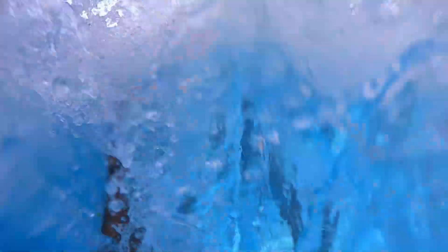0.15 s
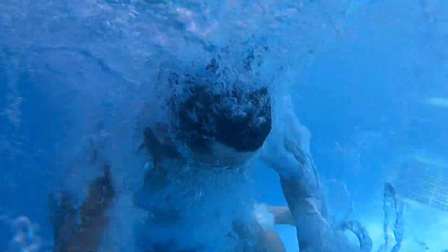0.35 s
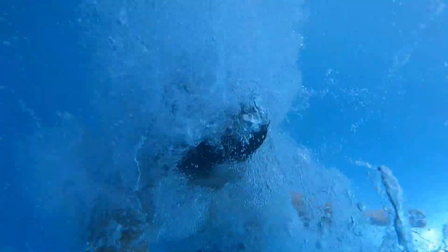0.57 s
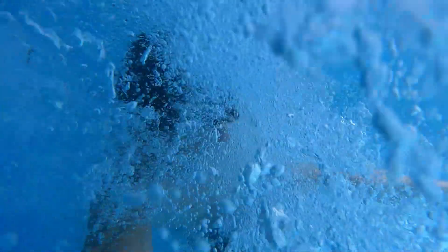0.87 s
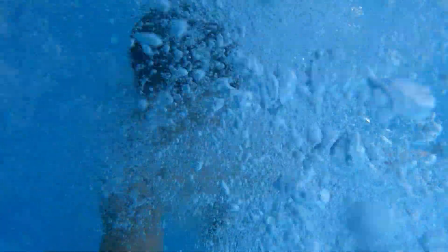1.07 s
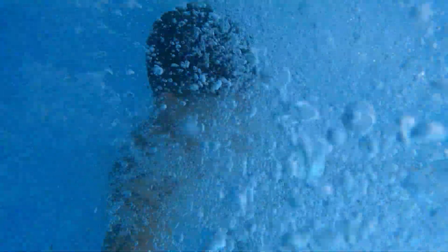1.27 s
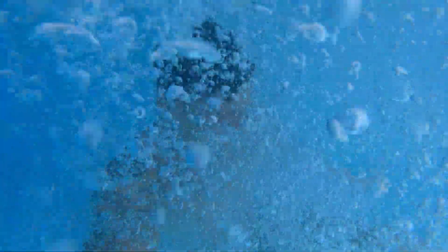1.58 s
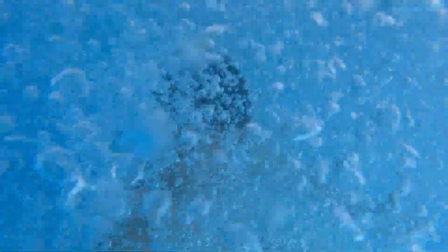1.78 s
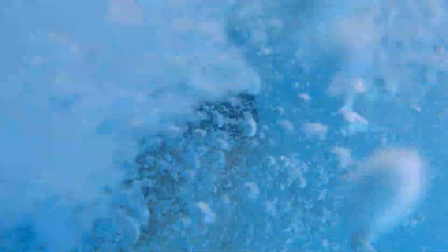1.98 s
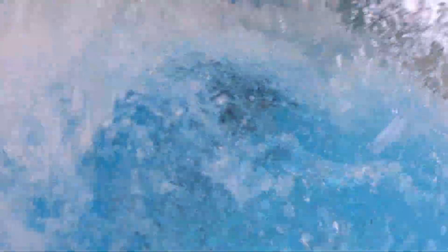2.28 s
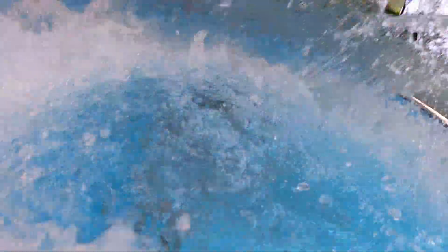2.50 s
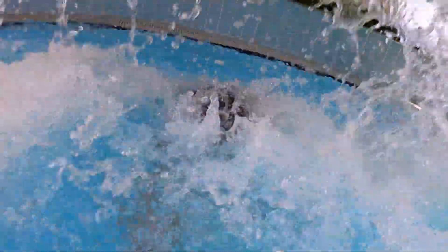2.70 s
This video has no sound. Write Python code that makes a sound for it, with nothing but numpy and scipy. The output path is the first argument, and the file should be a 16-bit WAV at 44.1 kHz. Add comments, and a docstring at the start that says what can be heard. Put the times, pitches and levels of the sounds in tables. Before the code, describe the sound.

Water splash and rushing spray cut to deep underwater gurgles, ending with a rumbling, splashy resurfacing

```python
"""Plunge from a water slide

A rider shoots off a water slide into the pool, holding a waterproof camera. Spray (shaped noise) and slaps
of water (noise bursts over dull thumps) give way to the plunge: big air pockets glug and a cloud of bubbles
gurgles and ticks (decaying sines), muffled by the housing, while buffeting rumbles. The camera rises through
froth and surfaces; drops smack it and the slide rushes on, ringing in the water film on the microphone."""
import sys
import numpy as np
from scipy import signal
from scipy.fft import rfft, irfft
from scipy.io import wavfile
from scipy.ndimage import uniform_filter1d

SR = 44100
rng = np.random.default_rng(int(sys.argv[2]) if len(sys.argv) > 2 else 0)


def waveform_to_disk(signal):
    """Save audio, clipped to [-1, 1], as 16-bit WAV at the path in sys.argv[1]."""
    frames = np.transpose(np.atleast_2d(signal))
    scaled = np.clip(frames, -1, 1) * 32767
    samples = np.round(scaled).astype(np.int16)
    wavfile.write(sys.argv[1], SR, samples)


N = 125685  # length in samples

# Spray in the open air: level [t/s, level/dB] and spectrum [f/Hz, level/dB]
SPRAY_LEVEL = [(0, -34.5), (.22, -28), (.3, -31), (.38, -32), (.455, -28.5), (.485, -59)]
SPRAY_SPECTRUM = [(40, -15), (150, -6), (500, -2), (1000, -7), (3300, -11.5), (5400, -21.5), (6600, -34),
                  (9000, -41.5), (15000, -59)]
# Rush of the slide through the wet microphone: level [t/s, level/dB] and spectrum [f/Hz, level/dB]
RUSH_LEVEL = [(2.24, -61), (2.29, -30), (2.45, -31.5), (2.68, -37), (2.85, -37.5)]
RUSH_SPECTRUM = [(35, 15.5), (130, -5.5), (650, -3), (1400, -6.5), (1900, -3), (2900, -25), (5000, -31.5),
                 (7500, -57)]
# Two resonances of the draining water film, before flutter [t/s, upper f/Hz, lower level/dB, upper level/dB]
FILM_RESONANCES = [(2.27, 2767, -48.5, -60), (2.338, 3400, -35.5, -49.5), (2.421, 3780, -41, -55.5),
                   (2.508, 3520, -36, -47), (2.601, 3660, -44.5, -60), (2.739, 3800, -55, -75)]
# Water pushing on the housing: level [t/s, level/dB] and spectrum [f/Hz, level/dB]
BUFFET_LEVEL = [(0, -36), (.2, -24), (.31, -26), (.48, -38), (.85, -25.5), (1.12, -25), (1.24, -31),
                (1.65, -32), (1.8, -20.5), (2.18, -22), (2.28, -27), (2.34, -19), (2.41, -26), (2.55, -19),
                (2.62, -35.5), (2.85, -51)]
BUFFET_SPECTRUM = [(15, 4.5), (35, 4), (60, 8), (100, -8.5), (170, -8), (300, -17), (800, -72.5)]
# Surges that shove the housing [t/s, onset f/Hz, level before swell and decay/dB]
SURGES = [(0.244, 73, -2.5), (0.473, 61.7, -7), (2.15, 52.6, -6), (2.322, 47.5, -10), (2.5, 64.3, -8)]
# Slaps of water on the housing [t/s, level before swell and decay/dB, burst decay time constant/s, cut-off f/Hz]
SLAPS = [(0.229, -20, 0.023, 8300), (0.432, -17, 0.019, 4000), (0.456, -15, 0.0065, 3700),
         (0.469, -7, 0.004, 2000), (0.508, -13, 0.012, 2950), (.575, -22.5, 0.0065, 3000),
         (0.714, -25.5, 0.041, 3500), (.806, -16.5, 0.0024, 3630), (1.712, -25, 0.0017, 5200),
         (1.75, -35, 0.0046, 4740), (1.773, -18, 0.003, 3770), (1.783, -23, 0.0034, 4000),
         (1.877, -36, 0.005, 4200), (2.084, -30, 0.01, 3800), (2.13, -24, 0.0084, 3000),
         (2.174, -26, 0.013, 2650), (2.24, -25, 0.011, 2760), (2.341, -21.5, 0.005, 4000),
         (2.453, -14.5, 0.005, 3300), (2.486, -28, 0.007, 4800), (2.511, -22.5, 0.0042, 4400),
         (2.582, -35, 0.016, 3000)]
# Large, middling and small bubbles of the cloud: levels [t/s, level/dB]
LARGE_LEVEL = [(.33, -26.5), (.44, -19), (.56, -22), (.68, -26.5), (.87, -22.5), (1.181, -17.5),
               (1.225, -27), (1.291, -19), (1.66, -18), (1.742, -19.5), (1.921, -16), (2.18, -21),
               (2.25, -25)]
MIDDLE_LEVEL = [(.28, -31.5), (.35, -31.5), (.43, -34), (.49, -20.5), (.55, -24.5), (.68, -27), (.745, -21),
                (.84, -39.5), (.91, -27), (1.07, -36), (1.16, -31), (1.22, -40), (1.66, -42.5), (1.79, -34),
                (1.98, -22), (2.19, -30), (2.29, -38)]
SMALL_LEVEL = [(0.459, -30.5), (.56, -41), (0.659, -36.5), (.69, -48.5), (.84, -33), (.91, -26), (.98, -39),
               (1.13, -44), (1.208, -57), (1.429, -61), (1.68, -53.5), (1.77, -34), (1.83, -40),
               (1.94, -42), (2.02, -44.5), (2.289, -47)]
# The same three sizes heard through the housing: spectra [f/Hz, level/dB]
LARGE_SPECTRUM = [(40, -22.5), (90, -3), (145, -3.5), (220, -0.5), (380, 2), (580, -4), (900, -15),
                  (1400, -33.5)]
MIDDLE_SPECTRUM = [(300, -9), (600, -4), (1120, 3.5), (1350, -1.5), (1800, -7.5), (2100, -10.5),
                   (2400, -31)]
SMALL_SPECTRUM = [(900, 0.5), (1750, 9), (2250, -6.5), (2800, 0), (3500, -8.5), (4600, -24.5), (7000, -41)]
# Froth boiling just under the surface: level [t/s, level/dB] and spectrum [f/Hz, level/dB]
FROTH_LEVEL = [(1.86, -56), (1.951, -39), (2.04, -23), (2.139, -19), (2.201, -29), (2.23, -47)]
FROTH_SPECTRUM = [(400, -0.5), (1200, -2), (1550, 8), (1800, -22.5), (2100, -22)]
# Fine foam crackling on the housing: level [t/s, level/dB] and spectrum [f/Hz, level/dB]
FOAM_LEVEL = [(.6, -58), (.92, -58), (1.1, -75.5), (1.68, -89), (1.72, -55.5), (1.79, -61.5), (1.97, -72.5),
              (2.28, -72), (2.35, -57), (2.52, -52.5), (2.66, -76)]
FOAM_SPECTRUM = [(1500, 1.5), (5500, -5.5), (7200, -19)]
# Single big air pockets [t/s, onset f/Hz, level before swell, decay, flutter and low-pass/dB,
# cycles of the onset pitch until 60 dB down]
GLUGS = [(.483, 970, -6.5, 39.5), (0.510, 213.4, 8.5, 11.5), (0.509, 1143, -5.5, 57), (0.546, 976, -9, 35),
         (.574, 688, -7.5, 63), (0.697, 505, -10.5, 39.5), (0.714, 268, 4.5, 10.5), (0.723, 1013, -12, 93),
         (.73, 870, -7.5, 90), (0.74, 227, 3.5, 11), (0.848, 186, -5, 18), (0.848, 491, -14, 44),
         (1.274, 338.8, -13, 61.5), (1.413, 443.4, -13.5, 66), (1.594, 306.4, -11.5, 42),
         (1.62, 349.7, -10, 85.5), (2.189, 547, 2.5, 18.5), (2.257, 775, -4, 17)]
# Small bubbles that burst against the housing [t/s, f/Hz, level before swell, decay and low-pass/dB]
PINGS = [(0.877, 2780, -14), (0.898, 2860, -14.5), (0.897, 3490, -18.5), (1.122, 2630, -24.5),
         (1.228, 4030, -30.5), (1.286, 1946, -20.5), (1.472, 2970, -36.5), (1.532, 3130, -40),
         (1.661, 3060, -34), (1.711, 1380, -11.5), (1.874, 1990, -13.5), (1.885, 3270, -29),
         (2.245, 2700, -22.5), (2.342, 3400, -18.5)]

FILM_LOWER_HZ, FILM_WIDTH_HZ = 1874, 280
SURGE_CYCLES = 6.8  # until 60 dB down
SLAP_ATTACK_SHARE = 0.18  # attack time constant as a share of the decay's
THUMP_HZ, THUMP_DB = 164, 3  # cut-off; level relative to the burst
STEADY_S = 0.056  # the bubble textures are evened over one or two of these
GLUG_RISE, GLUG_ATTACK_CYCLES = 0.1, 1.4  # fractional climb in pitch by 60 dB down; swell
PING_CYCLES, PING_ATTACK_CYCLES = 55, 4
HOUSING_HZ, HOUSING_CYCLES, HOUSING_DB = 1707, 34, -2.5  # the housing's own ring, level relative to the ping
OVERLOAD = 0.98  # amplitude that rounded peaks approach
TOP_HZ = 15600


def undb(db):
    """Decibels are twenty times the decimal logarithm of the amplitude ratio; return that ratio."""
    return 10 ** (np.asarray(db) / 20)


def unit(x):
    """Normalisation: divide by the root mean square so that it becomes 1."""
    return x / np.sqrt(np.mean(x ** 2) + 1e-18)


def fader(rows, fade_db_per_s=900):
    """Envelope: gain linear in decibels between (t/s, level/dB) points, dying away beyond the ends."""
    t = np.arange(N) / SR
    s, db = np.array(rows).T
    outside_s = np.abs(t - np.clip(t, s[0], s[-1]))
    return undb(np.interp(t, s, db) - fade_db_per_s * outside_s)


def colour(x, points):
    """Minimum-phase filtering through (f/Hz, level/dB) points, falling steeply above the last; rms 1."""
    hz, db = np.array(points).T
    size = 8192
    f = np.maximum(np.fft.rfftfreq(size, 1 / SR), 1)
    octaves_above = np.log2(np.maximum(f / hz[-1], 1))
    shape_db = np.interp(np.log(f), np.log(hz), db) - 24 * octaves_above
    # folding the cepstrum onto positive time makes the response causal
    cepstrum = irfft(np.log(undb(shape_db)))
    cepstrum[1:size // 2] *= 2
    cepstrum[size // 2 + 1:] = 0
    impulse_response = irfft(np.exp(rfft(cepstrum)))
    return unit(signal.fftconvolve(x, impulse_response)[:N])


def lowpass(x, hz, order=2):
    """Butterworth low-pass: a maximally flat passband below the cut-off."""
    sections = signal.butter(order, min(hz, SR / 2 - 1000), fs=SR, output="sos")
    return signal.sosfilt(sections, x)


def even(x, span_s):
    """Level equalisation: divide a random texture by its running rms over about the given span."""
    size = max(int(span_s * SR), 2)
    power = uniform_filter1d(uniform_filter1d(x ** 2, size), size)
    return x / np.sqrt(np.abs(power) + 1e-9)


def add(out, s, sound):
    """Superposition: sum a sound into the mix from time s."""
    i = int(np.clip(s * SR, 0, N - 1))
    out[i:i + len(sound)] += sound[:N - i]


def flutter(depth_db, rate_hz):
    """Random amplitude modulation: low-passed noise makes the gain tremble in decibels."""
    return undb(depth_db * unit(lowpass(rng.standard_normal(N), rate_hz)))


def patter(spread_db):
    """Shot noise: countless droplets merge into a hiss; a wider spread of strengths makes it crackle."""
    strength = np.minimum(rng.exponential(size=N), 7)
    return rng.standard_normal(N) * undb(spread_db * strength)


def bubble(hz, cycles, rise, attack_cycles):
    """Volume pulsation of an air pocket: a damped sine that swells, fades and may climb in pitch."""
    c = np.arange(int(cycles * SR / hz) + 2) * hz / SR  # time in cycles of the onset pitch
    age = c / cycles  # 1 at 60 dB down
    tone = np.sin(2 * np.pi * c * (1 + rise * age / 2))
    decay = np.exp(-np.log(1000) * age)
    swell = 1 - np.exp(-(c / attack_cycles) ** 2)
    return tone * decay * swell


def cloud(low_hz, high_hz, per_s, cycles, rise, spread_db, attack_cycles):
    """Incoherent sum of bubbles of random time, pitch, strength and ring time."""
    out = np.zeros(N)
    count = int(per_s * N / SR)
    for when, pitch, strength, ring in rng.random((count, 4)):
        hz = low_hz * (high_hz / low_hz) ** pitch
        gain = undb(-spread_db * np.log(1 - strength * .99))
        sound = bubble(hz, cycles * 2 ** (ring - .5), rise, attack_cycles)
        add(out, when * N / SR, gain * sound)
    return out


def water_film():
    """Resonance of a draining film: two narrow bands of noise, the upper gliding, ring fitfully."""
    t = np.arange(N) / SR
    s, upper_hz, lower_db, upper_db = np.array(FILM_RESONANCES).T
    lower = (np.full(N, FILM_LOWER_HZ), lower_db)
    upper = (np.interp(t, s, upper_hz), upper_db)
    film = 0
    for hz, db in (lower, upper):
        phase = 2 * np.pi * np.cumsum(hz) / SR
        # two slow noises in quadrature form a band around the resonance
        a, b = lowpass(rng.standard_normal((2, N)), FILM_WIDTH_HZ / 2)
        band = unit(a * np.cos(phase) + b * np.sin(phase))
        film = film + band * fader(np.column_stack([s, db]))
    return film * flutter(depth_db=4.5, rate_hz=50)


def open_air():
    """Broadband droplet noise: spray before the dive, then the slide's rush with the ringing film."""
    drops = patter(spread_db=3)
    spray = colour(drops, SPRAY_SPECTRUM) * fader(SPRAY_LEVEL)
    rush = colour(drops, RUSH_SPECTRUM) * fader(RUSH_LEVEL)
    return spray + rush + water_film()


def buffeting():
    """Turbulent pressure: eddies rumble on the housing as low noise and surges shove it as damped sines."""
    eddies = colour(rng.standard_normal(N), BUFFET_SPECTRUM)
    out = even(eddies, 0.025) * fader(BUFFET_LEVEL)
    for s, hz, db in SURGES:
        add(out, s, undb(db) * bubble(hz, SURGE_CYCLES, rise=0.092, attack_cycles=0.36))
    return out


def slaps():
    """Impact of water: a droplet burst over a dull thump; the longer ones swell more slowly."""
    out = np.zeros(N)
    t = np.arange(SR // 4) / SR
    for s, db, decay_s, cut_hz in SLAPS:
        drops, push = rng.standard_normal((2, len(t)))
        muffled = lowpass(lowpass(drops, cut_hz, order=4), 1200, order=1)
        burst = unit(muffled) * np.exp(-t / decay_s)
        # the thump dies away half as fast as the burst
        thump = undb(THUMP_DB) * unit(lowpass(push, THUMP_HZ, order=3)) * np.exp(-t / decay_s / 2)
        attack = 1 - np.exp(-t / (SLAP_ATTACK_SHARE * decay_s))
        add(out, s, undb(db) * (burst + thump) * attack)
    return out


def bubbling():
    """Pitch falls with bubble size: low gurgle, burble and fine ticking, with boiling froth and foam noise."""
    large = cloud(low_hz=80, high_hz=900, per_s=380, cycles=38, rise=.24, spread_db=2.1, attack_cycles=2.2)
    middle = cloud(low_hz=500, high_hz=1900, per_s=1100, cycles=48, rise=.13, spread_db=3, attack_cycles=1.8)
    small = cloud(low_hz=1500, high_hz=6000, per_s=2200, cycles=42, rise=.03, spread_db=4.2,
                  attack_cycles=3.5)
    froth = cloud(low_hz=450, high_hz=1900, per_s=2000, cycles=28, rise=.12, spread_db=2.5, attack_cycles=1.2)
    gurgle = even(colour(large, LARGE_SPECTRUM), STEADY_S) * fader(LARGE_LEVEL)
    burble = even(colour(middle, MIDDLE_SPECTRUM), STEADY_S) * fader(MIDDLE_LEVEL)
    ticking = even(colour(small, SMALL_SPECTRUM), 2 * STEADY_S) * fader(SMALL_LEVEL)
    boiling = even(colour(froth, FROTH_SPECTRUM), STEADY_S) * fader(FROTH_LEVEL)
    foam = colour(patter(spread_db=6.0), FOAM_SPECTRUM) * fader(FOAM_LEVEL)
    return gurgle + burble + ticking + boiling + foam


def near_bubbles():
    """Free and forced ringing: wobbling air pockets glug; small bubbles ping and set the housing ringing."""
    glugs, pings = np.zeros(N), np.zeros(N)
    for s, hz, db, cycles in GLUGS:
        add(glugs, s, undb(db) * bubble(hz, cycles, GLUG_RISE, GLUG_ATTACK_CYCLES))
    for s, hz, db in PINGS:
        ping = bubble(hz, PING_CYCLES, 0, PING_ATTACK_CYCLES)
        housing_ring = bubble(HOUSING_HZ, HOUSING_CYCLES, 0, PING_ATTACK_CYCLES)
        add(pings, s, undb(db) * ping)
        add(pings, s, undb(db + HOUSING_DB) * housing_ring)
    wobbling = glugs * flutter(depth_db=2, rate_hz=97)
    return lowpass(wobbling + pings, 3800, order=4)


def scene():
    """Superposition of all sources at the one microphone."""
    mix = open_air() + buffeting() + slaps() + bubbling() + near_bubbles()
    return mix[None]


def record(dry):
    """Saturation and band limiting: the camera rounds the loudest peaks and cuts the top."""
    rounded = dry / (1 + (dry / OVERLOAD) ** 6) ** (1 / 6)
    # 0.2 dB passband ripple, 70 dB stopband rejection
    top_cut = signal.ellip(8, .2, 70, TOP_HZ, fs=SR, output="sos")
    return signal.sosfilt(top_cut, rounded)


dry = scene()
out = record(dry)
waveform_to_disk(out)
```